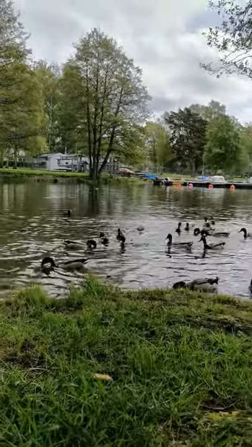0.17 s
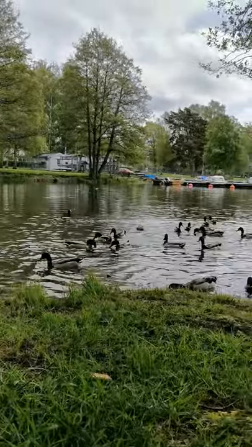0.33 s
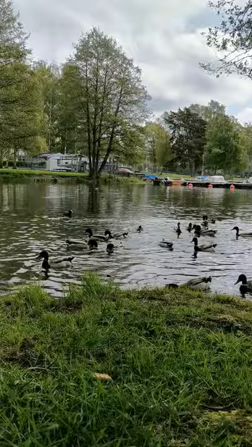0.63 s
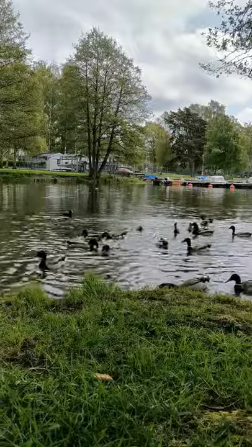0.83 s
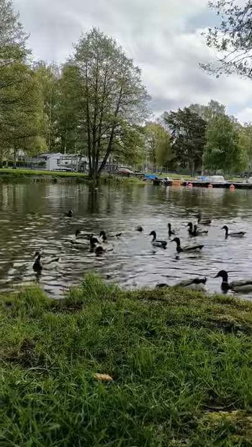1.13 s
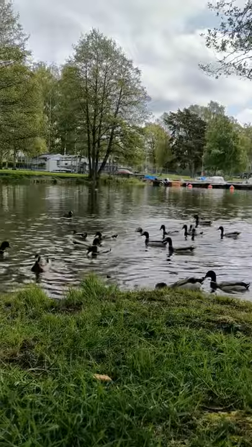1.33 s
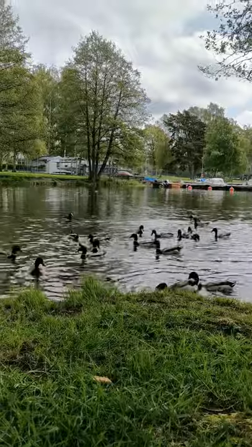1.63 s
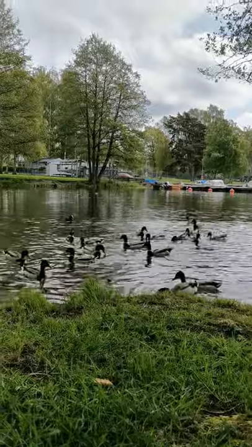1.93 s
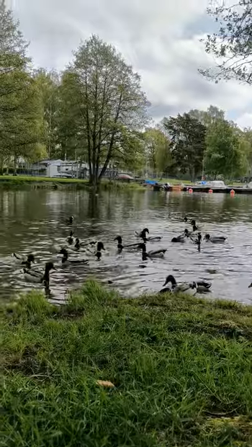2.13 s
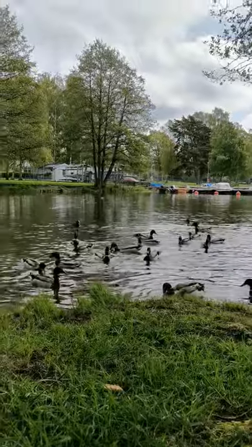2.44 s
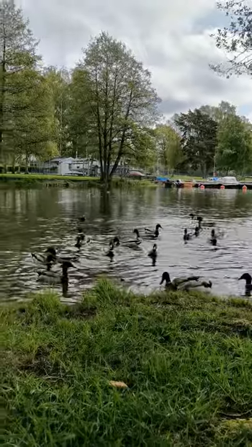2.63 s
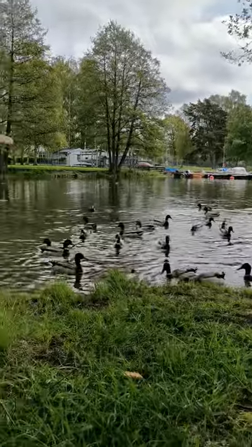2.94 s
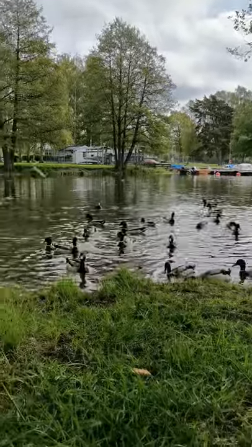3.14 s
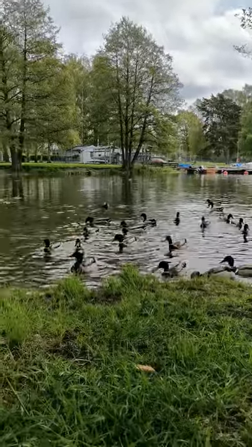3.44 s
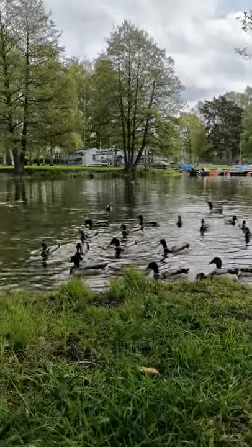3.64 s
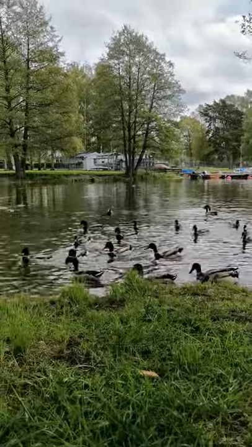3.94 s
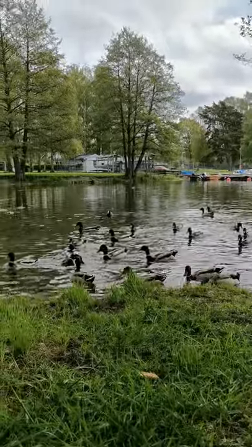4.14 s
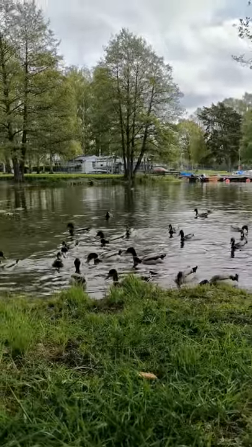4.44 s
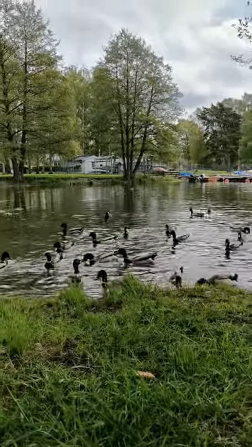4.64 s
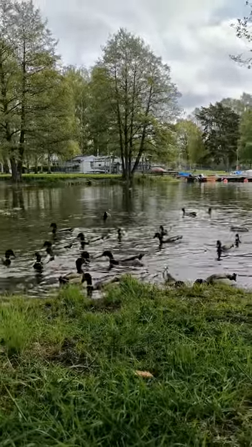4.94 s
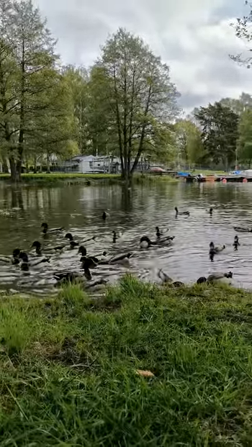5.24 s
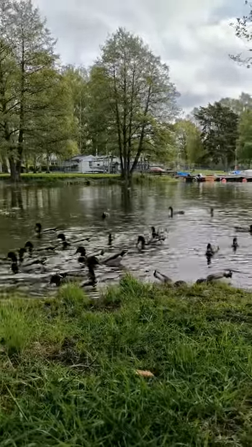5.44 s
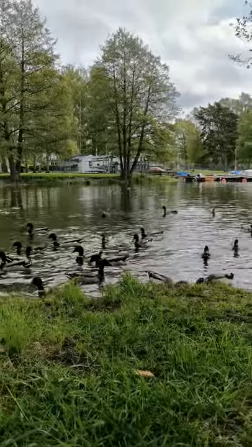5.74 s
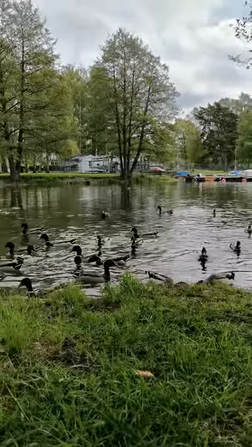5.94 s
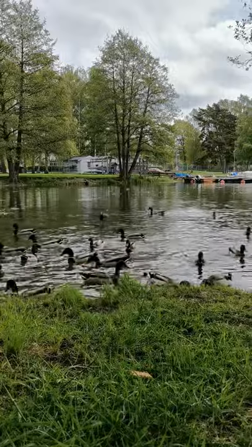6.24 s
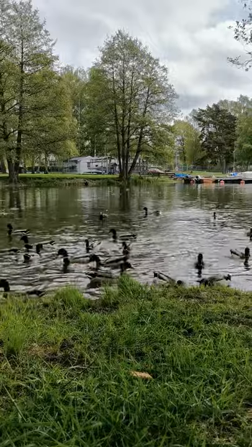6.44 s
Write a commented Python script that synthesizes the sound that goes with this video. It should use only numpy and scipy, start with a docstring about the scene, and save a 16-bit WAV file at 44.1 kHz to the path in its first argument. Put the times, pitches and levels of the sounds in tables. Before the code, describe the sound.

Close cloth rustling and crackling over soft wind rumble, with raspy low duck quacks, small water plops and a brief splashy scramble on a pond.

```python
"""Mallard drakes rasp at a pond edge while someone feeds them: puffs gate a throat tone and filtered noise.
A jacket rubs and ticks close to the right microphone: coloured random grains, single snaps, case bumps.
An arm swings once and ducks splash after the food: shaped grain beds. Plops are rising decaying sines.
Under it lie wind rumble, two wavering hums and a wash of open air; thin whistles cross the pond."""
import sys
import numpy as np
from scipy import signal
from scipy.fft import rfft, irfft
from scipy.io import wavfile
from scipy.ndimage import uniform_filter1d

SR = 44100
rng = np.random.default_rng(int(sys.argv[2]) if len(sys.argv) > 2 else 0)


def file_out(sig):
    """Save sig as 16-bit WAV at sys.argv[1]."""
    # one column per channel
    cols = np.atleast_2d(sig).T
    # limit, then scale
    lim = np.clip(cols, -1, 1)
    pcm = np.round(lim * 32767).astype(np.int16)
    wavfile.write(sys.argv[1], SR, pcm)


N = 290178
TIME_S = np.arange(N) / SR

# Sleeve strokes: [t at full speed/s, held/s, rise/s, fall/s, hiss level/dB, drag level/dB before trim]
STROKES = [(0.0, .41, .05, .2, -48, -53.5), (0.57, .2, 0.6, .25, -51, -47.5),
           (0.88, .34, 0.22, .4, -58.5, -55), (1.61, 0.1, 0.54, 0.13, -51, -53),
           (1.84, 0.061, 0.26, 0.31, -40.5, -52.5), (1.971, 0.094, 0.078, 0.027, -45.5, -53.5),
           (2.32, 0.088, 0.18, .12, -61, -71), (2.66, .1, 0.5, .3, -63.5, -77),
           (2.9, 0.019, 0.26, 0.33, -55, -60), (4.34, 0.063, 0.7, 0.18, -74.5, -76),
           (4.54, 0.12, .15, 0.15, -61.5, -66), (5.13, 0.14, 0.49, .15, -53.5, -59),
           (5.32, 0.031, 0.073, .15, -47.5, -47.5), (5.509, .14, 0.19, 0.3, -40, -53),
           (5.702, 0.24, 0.15, 0.21, -47.5, -42.5), (6.08, 0.92, 0.3, 0.16, -60.5, -50)]
# Cloth sliding smoothly: [f/Hz, level/dB]
SLIDE_SPECTRUM = [(200, -22), (900, -15), (1600, -4.5), (2350, 6.5), (3300, -6), (4400, 0), (5700, -0.5),
                  (7100, 4), (8500, -4), (10000, 2), (10900, 4.5), (12800, -1.5), (14000, -4.5),
                  (15800, -7.5)]
# Cloth dragging stickily; also colours scuffs: [f/Hz, level/dB]
DRAG_SPECTRUM = [(60, -20.5), (160, -3), (320, 1), (600, -4.5), (950, -5.5), (1400, -2), (2100, 4.5),
                 (2650, -1.5), (3300, -12), (5000, -11.5), (9000, -13), (15000, -30)]
# Small creases giving way: [f/Hz, level/dB]
CREASE_SPECTRUM = [(100, -16.5), (450, -2.5), (800, -3), (1300, 1.5), (1700, -2.5), (2200, 1), (2700, -3),
                   (3300, -20), (4300, -9), (7000, -13), (15000, -28)]
SWELL_RANGE_DB, REST_DB = 26, -73.5  # span of one rise or fall; the jacket never lies quite still
CREASES_PER_S, CREASE_SPREAD_DB, CREASE_DB = 90, 3.5, -5

# Light breeze on the microphones: [t/s, level/dB before trim]
BREEZE = [(0, -68), (.5, -60), (.8, -56), (1.85, -59), (2.2, -55.5), (4, -56.5), (4.9, -59), (6.58, -57)]
# Gusts on the microphones: [t/s, held/s, level/dB before trim]
GUSTS = [(0.63, 0.044, -48), (1.14, .04, -50.5), (2.89, 0.032, -46.5), (3.27, .06, -52.5),
         (5.29, 0.048, -49), (6.37, 0.045, -47.5)]
GUST_RISE_S, GUST_FALL_S = .08, .15
# Wind common to both microphones: [f/Hz, level/dB]
WIND_SPECTRUM = [(12, -3.5), (30, -2), (60, -2.5), (90, -7.5), (140, -14), (220, -14.5), (400, -42.5),
                 (900, -71)]
# Eddies separate at each microphone: [f/Hz, level/dB]
EDDY_SPECTRUM = [(12, 3.5), (35, 8.5), (60, -1.5), (120, -7), (400, -32)]
# Grip shifting: [t/s, level/dB]
GRIP = [(5.27, -75), (5.35, -74), (5.37, -45), (5.45, -44), (5.52, -51), (5.6, -54)]
# Grip thud: [f/Hz, level/dB]
THUD_SPECTRUM = [(30, 4.5), (90, -3.5), (200, -4), (330, -13), (600, -14.5), (1500, -33)]
# Distant hum: [t/s, level/dB before waver and balance]
HUM = [(0, -56), (.6, -47.5), (1.2, -56.5), (2.2, -54.5), (2.7, -64), (6.58, -59.5)]
# Higher drone, comes and goes: [t/s, level/dB before waver and balance]
DRONE = [(2.9, -68), (3.15, -59), (3.32, -55), (3.55, -61), (4.3, -63.5), (5, -61.5)]
HUM_HZ, DRONE_HZ = 52.9, 81.7  # mean pitches
# Wash of open air: [f/Hz, level/dB]
AIR_SPECTRUM = [(59, -24), (100, 1), (255, -6), (461, -13.5), (950, -9.5), (1330, -10.5), (1830, -8.5),
                (2580, -11), (3470, -29.5), (6700, -30.5), (8640, -53), (12400, -51), (16000, -51)]
AIR_DB = -59.5

# Folds of cloth snapping: [t/s, level/dB before trim, treble/dB]
SNAPS = [(0.045, -24, -9), (0.067, -23.5, -29), (0.097, -18, -10.5), (0.195, -22.5, -5), (0.273, -20.5, 23),
         (0.379, -17.5, -13.5), (0.425, -22.5, -20), (0.432, -23, 1), (0.48, -20.5, -5), (0.551, -22, -31),
         (0.619, -15, -26), (0.623, -18.5, -19), (0.896, -20, -2), (1.213, -21, 2), (1.517, -29.5, -12),
         (1.668, -18, 0.5), (1.792, -21.5, -5), (1.832, -21, 1), (2.042, -26.5, -2), (2.083, -30, -14),
         (2.835, -35, -11), (2.887, -43, -18), (2.905, -28, -18), (4.59, -30, 16), (5.659, -21, -6),
         (5.699, -20, -25), (5.757, -21, -5), (5.782, -18, -5), (5.804, -18.5, -17), (5.884, -21, -19),
         (5.939, -22, -10), (5.947, -19.5, -4), (5.954, -19, -7), (5.962, -17, -12), (5.977, -13, -0.5),
         (5.997, -28, 8), (6.053, -19, -10), (6.11, -19.5, -13), (6.182, -18, -11), (6.358, -20.5, -5),
         (6.458, -16.5, -13.5), (6.552, -18.5, -12.5), (6.565, -25.5, -10)]
# Snap: [f/Hz, level/dB before treble]
SNAP_SPECTRUM = [(100, -18), (400, -15), (700, 3), (1000, -11), (1500, -7), (2100, 5.5), (2600, 1.5),
                 (3300, -18.5), (4200, 2), (5200, -3.5), (7200, -1.5), (8800, -5), (10800, -4),
                 (15500, -24)]
# Cloth catching and scuffing: [t/s, length/s, level/dB]
SCUFFS = [(0.126, 0.059, -44), (0.394, 0.045, -41), (0.548, 0.035, -44), (0.583, 0.055, -44),
          (0.864, .022, -43.5), (5.874, .048, -50), (5.944, 0.0312, -38), (6.16, 0.073, -47.5),
          (6.348, 0.033, -43)]
# Hand bumping the case: [t/s, peak/dB, f/Hz]
BUMPS = [(0.067, -34.5, 447), (0.146, -34, 330), (0.166, -35.5, 261), (0.279, -34, 408), (0.392, -32, 284),
         (0.405, -32, 383), (0.433, -34.5, 316), (0.605, -35.5, 242), (0.766, -35, 375), (0.9, -39, 308),
         (1.667, -38.5, 283), (1.991, -37, 208), (2.967, -33, 520), (5.362, -30.5, 220),
         (5.495, -36.5, 346), (5.54, -28.5, 340), (5.788, -31.5, 270), (6.107, -28.5, 487)]

# Quacks: [t/s, length/s, level/dB before trim, pulse rate/Hz, throat f/Hz, roughness 0-1, clipped above]
QUACKS = [(0.944, 0.029, -51.5, 78, 1900, 0), (1.115, 0.15, -53, 73, 1770, 0),
          (1.458, 0.074, -50.5, 75, 1850, .8), (1.614, 0.09, -50.5, 70, 1900, 0.6),
          (2.022, 0.057, -48, 85, 1900, 0.1), (2.226, 0.067, -45, 44, 2000, 0.5),
          (2.281, 0.091, -41, 85, 1851, 0.22), (2.646, 0.09, -45.5, 71, 2040, 0.87),
          (2.707, 0.07, -39, 86, 2127, 0.9), (3.118, .1, -42.5, 73, 2058, 0.54),
          (3.542, 0.073, -60.5, 91, 1900, 1), (3.609, 0.026, -43.5, 83, 1840, 0.27),
          (3.647, 0.065, -53, 65, 2050, 1.1), (3.779, .11, -44.5, 97, 1967, .5),
          (4.101, .066, -42.5, 89, 1890, 0.16), (4.178, 0.046, -57.5, 89, 2130, 0.7),
          (4.257, 0.044, -47, 85, 1700, .15), (4.285, 0.097, -43.5, 91, 1900, 0.13),
          (4.408, 0.041, -48, 69, 1900, 0.04), (4.533, 0.065, -43.5, 86, 1880, .1),
          (4.742, 0.068, -46, 103, 1880, 0.3), (4.815, 0.039, -56, 104, 1780, 0.2),
          (5.014, 0.038, -44.5, 103, 1890, 0.01), (5.16, 0.14, -42.5, 90, 1832, 0.22),
          (6.28, 0.093, -43, 88, 1950, 0.3)]
# Throat and bill for a resonance at THROAT_HZ: [f/Hz, level/dB]
THROAT_SPECTRUM = [(200, -54), (700, -20), (1100, -15.5), (1500, -4), (1900, 9.5), (2250, -3.5), (2520, 1),
                   (3000, -20.5), (3900, -38), (15000, -38)]
# Unpulsed air from the bill: [f/Hz, level/dB]
BILL_SPECTRUM = [(2000, -19), (4300, -1.5), (5500, 7), (7000, 5.5), (9000, -22), (15000, 5)]
THROAT_HZ = 1900
CREST = 0.372  # share of the length at which a quack is loudest
QUICKEN, GAPE = 0.048, 0.044  # pulse rate runs from 1 - QUICKEN to 1 + QUICKEN; throat rises by GAPE
MUTTER_S, MUTTER_DB, MUTTER_PER_S, MUTTER_ROUGH = .05, -55, 88, .4  # means for soft quacks, before trim
# Whistles across the pond: [t/s, length/s, level/dB, f at the ends/Hz, rise in the middle/Hz]
WHISTLES = [(3.74, .22, -77, 4500, 390), (3.885, 0.044, -60, 1260, 15), (4.402, 0.24, -62.5, 2845, 200),
            (4.85, 0.124, -66, 2130, 50), (5.05, 0.15, -60, 2080, 79), (5.28, .34, -51.5, 2300, 180)]
# Single plops: [t/s, level/dB, starting f/Hz]
PLOPS = [(2.424, -40.5, 2120), (2.437, -45, 770), (2.627, -35.5, 2570), (3.063, -40, 1320),
         (3.278, -42, 497), (3.317, -39, 935), (3.453, -40, 1900), (3.972, -44.5, 2550)]
# Echo from the banks: [f/Hz, t60/s]
BANK_T60 = [(200, 0.15), (2000, 0.1), (6000, 0.1), (14000, 0.017)]

# Arm swinging: [t/s, level/dB]
SWING = [(2.78, -61), (2.83, -48), (2.865, -49), (2.89, -39.5), (2.925, -42), (2.95, -45), (2.968, -40.5),
         (2.985, -56.5), (3.1, -57.5)]
# Crackle of the swinging jacket: [f/Hz, level/dB]
SWISH_SPECTRUM = [(60, 2), (200, -7.5), (400, -2), (550, -4), (900, 0.5), (1500, -2), (2100, 3.5),
                  (2600, -5), (3400, -22), (6200, -14.5), (10000, -35), (15500, -40)]
# Ducks churning the water: [t/s, level/dB before churn]
SCRAMBLE = [(4.2, -78), (4.3, -59), (4.36, -48), (4.44, -49), (4.5, -47), (4.58, -51), (4.64, -54.5),
            (4.8, -63), (4.92, -89)]
# Splashing: [f/Hz, level/dB]
SPLASH_SPECTRUM = [(100, 2), (300, -0.5), (800, -1.5), (1100, 0), (1450, 5.5), (2200, 7), (2900, -5.5),
                   (3600, -22), (5000, -24), (9000, -30.5), (12000, -17), (15500, -36)]

# Left minus right, near cloth: [f/Hz, level/dB]
NEAR_SIDE = [(150, -4), (450, 1), (800, -7), (2100, -12), (3300, -6.5), (5000, -10.5), (9000, -16.5),
             (12000, -20), (15500, -36)]
# Left minus right, pond and surroundings: [f/Hz, level/dB]
FAR_SIDE = [(200, 2.5), (900, -2.5), (1500, -5), (1950, -14.5), (2550, -9.5), (3300, 8.5), (6000, 0.5),
            (9000, 11), (14000, -13)]
EDGE_HZ = 16150


def amp(db):
    """Decibels to gain."""
    return 10 ** (np.asarray(db) / 20)


def evened(x):
    """Scales to rms 1."""
    return x / np.sqrt(np.mean(x ** 2) + 1e-20)


def read(points, hz):
    """Interpolates a spectrum on a log-frequency axis."""
    f_hz, value = np.transpose(points)
    return np.interp(np.log(hz + 1), np.log(f_hz), value)


def level(rows):
    """Gain over time from a dB curve; -140 dB outside it."""
    return amp(np.interp(TIME_S, *np.transpose(rows), left=-140, right=-140))


def add(mix, s, sound):
    """Mixes a sound in at time s."""
    part = mix[..., max(round(s * SR), 0):][..., :sound.shape[-1]]
    part += sound[..., :part.shape[-1]]


def ring(points, size=2048):
    """Causal (minimum-phase) impulse response with the given spectrum."""
    log_gain = np.log(amp(read(points, abs(np.fft.fftfreq(size, 1 / SR)))))
    response = np.fft.ifft(np.exp(np.conj(signal.hilbert(log_gain)))).real
    return response[:size // 2]


def colour(x, points, size=2048):
    """Filters a sound to a spectrum."""
    return signal.oaconvolve(x, ring(points, size=size))[:len(x)]


def wander(rate_hz, size=N):
    """Random drift of rms 1, low-passed near rate_hz."""
    f_hz = np.fft.rfftfreq(size, 1 / SR)
    spectrum = rfft(rng.standard_normal(size)) / (1 + (f_hz / rate_hz) ** 4)
    return evened(irfft(spectrum, size))


def grains(per_s, spread_db):
    """Random clicks of unequal size, rms 1."""
    size = amp(spread_db * np.minimum(rng.exponential(1, N), 4.5))
    return evened(size * rng.choice([-1, 1], N) * (rng.random(N) < per_s / SR))


def ports(x, other, side, same, count=0):
    """Two microphones: the left is filtered, count samples late, and partly unrelated above the bass."""
    same = np.clip(same, 0, 1)
    size = 2 ** 19
    unrelated = (same - 1) * x + np.sqrt(1 - same ** 2) * other
    above_bass = np.clip(np.fft.rfftfreq(size, 1 / SR) / 700, 0, 1) ** 2
    apart = irfft(rfft(unrelated, size) * above_bass)[:N]
    left = np.pad(colour(x + apart, side), (count, 0))[:N]
    return np.array([left, x])


def texture(source, spectrum, side, same, count=0):
    """Coloured stereo bed from a random source; the mean of its channels has rms 1."""
    pair = ports(colour(source(), spectrum), colour(source(), spectrum), side, same, count=count)
    return pair / pair.mean(0).std()


def swell(s, held_s, rise_s, fall_s):
    """Gain that rises until time s, holds and dies away exponentially."""
    before = (s - TIME_S) / max(rise_s, .01)
    after = (TIME_S - s - held_s) / max(fall_s, .01)
    return amp(-SWELL_RANGE_DB * np.clip(np.maximum(before, after), 0, 10))


def sleeve(drag_db=-2, catch_db=3, flutter_db=1.9):
    """Threads slip: fine hiss when sliding, coarser grains and small creases when pressed."""
    hiss = texture(lambda: grains(14000, 4.06), SLIDE_SPECTRUM, NEAR_SIDE, 0.043, count=22)
    drag = texture(lambda: grains(900, 3.0), DRAG_SPECTRUM, NEAR_SIDE, 0.21, count=22)
    creases = texture(lambda: grains(CREASES_PER_S, CREASE_SPREAD_DB), CREASE_SPECTRUM, NEAR_SIDE, 0.7, count=22)
    power = sum((amp([[slide_db], [press_db]]) * swell(*shape)) ** 2
                for *shape, slide_db, press_db in STROKES)
    speed, pressure = np.sqrt(power)
    sliding = hiss * np.hypot(speed, amp(REST_DB)) * amp(flutter_db * wander(31))
    dragging = drag * amp(drag_db + catch_db * wander(28))
    return sliding + pressure * (dragging + creases * amp(CREASE_DB))


def buffet():
    """Wind strength: a light breeze and gusts, added in power."""
    gusts = sum((amp(db) * swell(s, held_s, GUST_RISE_S, GUST_FALL_S)) ** 2 for s, held_s, db in GUSTS)
    return np.sqrt(gusts + level(BREEZE) ** 2)


def noise():
    """White noise over the scene."""
    return rng.standard_normal(N)


def hums():
    """Two sines wavering in pitch and level."""
    total = np.zeros(N)
    for curve, hz in [(HUM, HUM_HZ), (DRONE, DRONE_HZ)]:
        phase = 2 * np.pi * np.cumsum(hz + 4 * wander(10)) / SR
        total += level(curve) * np.sin(phase) * amp(2.5 * wander(8))
    return total * amp([[1.5], [-2]])


def outdoors(wind_db=-2.0, own=0.66):
    """Lumpy low wind noise, the shifting grip, hums and the wash of open air."""
    shared = evened(colour(noise(), WIND_SPECTRUM, size=16384))
    eddies = np.array([evened(colour(noise(), EDDY_SPECTRUM, size=16384)) for _ in range(2)])
    wind = (shared * amp([[1], [-2]]) + own * eddies) * buffet() * amp(wind_db)
    grip = level(GRIP) * evened(colour(noise(), THUD_SPECTRUM, size=8192))
    air = amp(AIR_DB + wander(6.8)) * texture(noise, AIR_SPECTRUM, FAR_SIDE, .7)
    return wind + grip + hums() + air


def snap(db, treble_db):
    """A crease strains for a millisecond, gives way and settles; level is set by energy."""
    crumple, crumple_s, settle, settle_s, peak_to_energy = .3, .0007, .07, .006, 3.4
    since = np.arange(1500) - SR // 1000  # samples from the break
    away_s = abs(since) / SR
    strain = np.exp(-away_s / crumple_s) + settle * np.exp(-away_s / settle_s)
    spectrum = [(f, d + treble_db * (f > 3000)) for f, d in SNAP_SPECTRUM]
    sound = colour((since == 0) + crumple * rng.standard_normal(len(since)) * strain, spectrum)
    return amp(db) * peak_to_energy * sound / np.linalg.norm(sound)


def folds(snap_db=3.5):
    """Creases snap singly or scuff in grain clusters; bumps on the case are short decaying sines."""
    near, aside = np.zeros((2, N))
    for s, db, treble_db in SNAPS:
        add(near, s + .0005, snap(db + snap_db, treble_db))
        add(aside, s + .0005, snap(db + snap_db, treble_db))
    t = np.arange(2000) / SR
    for s, db, hz in BUMPS:
        bump = np.sin(2 * np.pi * hz * t) * (1 - np.exp(-t / 0.001)) * np.exp(-t / 0.0031)
        add(near, s, amp(db) * bump / abs(bump).max())
    catches = np.zeros(N)
    for s, length_s, db in SCUFFS:
        add(catches, s, amp(db) * signal.windows.tukey(int(length_s * SR), .15))
    scuffs = catches * texture(lambda: grains(2500, 2.4), DRAG_SPECTRUM, NEAR_SIDE, 0.38, count=22)
    return ports(near, aside, NEAR_SIDE, 1.0, count=22) + scuffs


def quack(length_s, db, rate_hz, hz, rough, edge_db=9, waver_hz=120, hiss_db=-21):
    """Short puffs from the syrinx gate a throat tone and a turbulent rasp; unpulsed bill hiss is added."""
    puff_s, uneven_db, jitter_s = .0019, 1.1, .0005
    leak = .11 + .33 * rough  # air between puffs
    t = np.arange(-.012, length_s + .02, 1 / SR)
    quickening = np.interp(t, [0, length_s], [1 - QUICKEN, 1 + QUICKEN])
    turns = np.cumsum(rate_hz * quickening) / SR
    turns -= np.interp(0, t, turns)
    puff_count = int(np.interp(length_s, t, turns)) + 1
    at = np.interp(np.arange(puff_count), turns, t)
    late, loud, wide = rng.standard_normal((24, 3))[:len(at)].T[:, :, None]
    age = (t - at[:, None] - jitter_s * late) / (puff_s * np.exp(.2 * wide))
    shape = np.exp(-.5 * (age / np.where(age < 0, .7, 1.15)) ** 2)  # faster rise than fall
    puffs = (amp(uneven_db * loud) * shape).sum(0)

    # effort sets both throat pitch and level
    effort = np.interp(t, [0, np.clip(CREST, .05, .95) * length_s, length_s], [-1, 0, -1])
    arch = amp(edge_db * effort)
    waver = waver_hz * wander(185, size=16384)[:len(t)]
    pitch_hz = hz * (1 + GAPE * (effort + .5)) + waver
    tone = np.sqrt(2) * np.sin(2 * np.pi * np.cumsum(pitch_hz) / SR)
    # the main resonance follows the call; the upper ones stay put
    throat = [(f * (hz / THROAT_HZ if f < 2100 else 1), d) for f, d in THROAT_SPECTRUM]
    rasp = evened(colour(rng.standard_normal(16384), throat))[:len(t)]
    rough = np.clip(rough, .02, 1)
    voice = np.sqrt(1 - rough) * tone + 1.3 * np.sqrt(rough) * rasp
    voice /= np.sqrt(uniform_filter1d(voice ** 2, size=400) + 1e-9)  # evens the level over 9 ms
    hiss = amp(hiss_db) * evened(colour(rng.standard_normal(16384), BILL_SPECTRUM))[:len(t)]
    return amp(db) * arch * (evened(puffs + leak) * voice + hiss) * signal.windows.tukey(len(t), .12)


def mutters(count=12, spread_db=2, variety=0.087):
    """Rows for soft quacks, one at random in each equal slice of the scene."""
    rows = []
    for k, (when, loud, fast, high) in enumerate(rng.random((count, 4))):
        s = (k + when) * N / SR / count
        db = MUTTER_DB + spread_db * (2 * loud - 1)
        rate_hz = MUTTER_PER_S * (1 + variety * (2 * fast - 1))
        hz = THROAT_HZ * (1 + variety * (2 * high - 1))
        rows.append((s, MUTTER_S, db, rate_hz, hz, MUTTER_ROUGH))
    return rows


def plop(db, hz):
    """A bubble rises in pitch as it dies; the splash adds a short tick."""
    t = np.arange(1500) / SR
    bubble = np.sin(2 * np.pi * hz * t * (1 + 6 * t)) * np.exp(-t / 0.0032)
    tick = .5 * rng.standard_normal(len(t)) * np.exp(-t / 0.00017)
    return amp(db) * (bubble + tick)


def whistle(length_s, db, hz, rise_hz):
    """Noise in a narrow resonance that arches in pitch."""
    width_hz = 110
    arch = np.sin(np.linspace(0, np.pi, int(length_s * SR)))
    angle = 2 * np.pi * np.cumsum(hz + rise_hz * arch ** 2) / SR
    a, b = (wander(width_hz, size=32768)[:len(arch)] for _ in range(2))
    return amp(db) * np.sqrt(2 * abs(arch)) * (a * np.sin(angle) + b * np.cos(angle))


def banks(x):
    """Thin, scattered echo from trees and shore: sparse taps decaying by frequency."""
    taps = rng.standard_normal(SR // 2) * (rng.random(SR // 2) < 2000 / SR)
    hz, t, z = signal.stft(taps, SR, nperseg=256)
    decay = amp(-60 * t / read(BANK_T60, hz)[:, None])
    tail = signal.istft(z * decay, SR, nperseg=256)[1]
    return signal.oaconvolve(x, tail / np.linalg.norm(tail))[:N]


def flock(gain_db=5, echo_db=-14):
    """Quacks, whistles and plops on the water, with their echo."""
    direct, aside = np.zeros((2, N))
    for s, *call in QUACKS + mutters():
        add(direct, s - .012, amp(gain_db) * quack(*call))
        add(aside, s - .012, amp(gain_db) * quack(*call))
    for s, *note in WHISTLES:
        add(direct, s, whistle(*note))
    for s, db, hz in PLOPS:
        add(direct, s, plop(db, hz))
    echo = ports(banks(direct), banks(direct), FAR_SIDE, 0.41)
    return ports(direct, aside, FAR_SIDE, 0.79, count=1) + amp(echo_db) * echo


def swing():
    """The throwing arm makes the jacket crackle: a bed of unequal grains."""
    return level(SWING) * texture(lambda: grains(1100, 4.8), SWISH_SPECTRUM, FAR_SIDE, 0.25)


def splash(churn_db=2):
    """Many small drops fall back as the ducks lunge: dense grains of wandering level."""
    drops = texture(lambda: grains(3000, 0.94), SPLASH_SPECTRUM, FAR_SIDE, 0.55)
    return level(SCRAMBLE) * amp(churn_db * wander(38)) * drops


def scene():
    """Everything heard from the bank."""
    return sleeve() + outdoors() + folds() + flock() + swing() + splash()


def record(dry):
    """Band limit: low-pass at EDGE_HZ."""
    lowpass = signal.firwin(511, EDGE_HZ, window=("kaiser", 9), fs=SR)
    return signal.oaconvolve(dry, lowpass[None], "same")


dry = scene()
out = record(dry)
file_out(out)
```